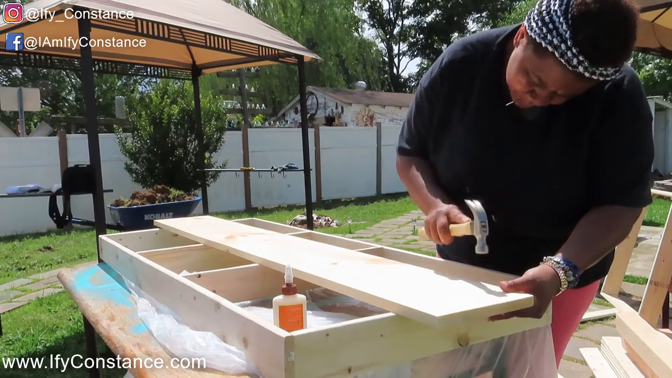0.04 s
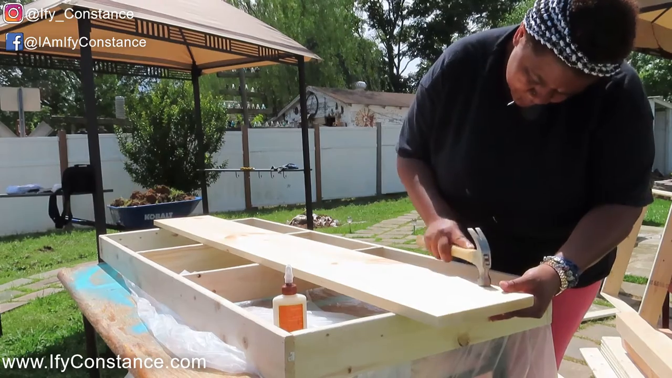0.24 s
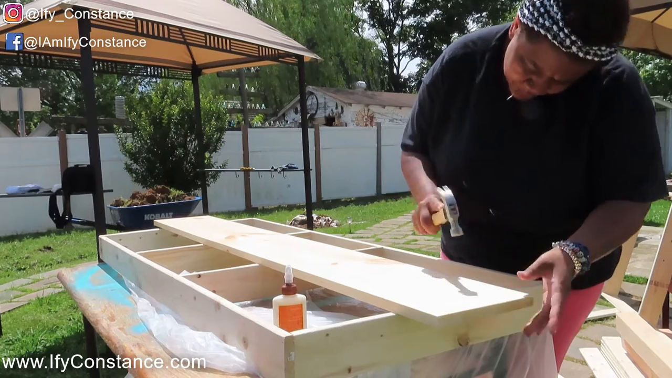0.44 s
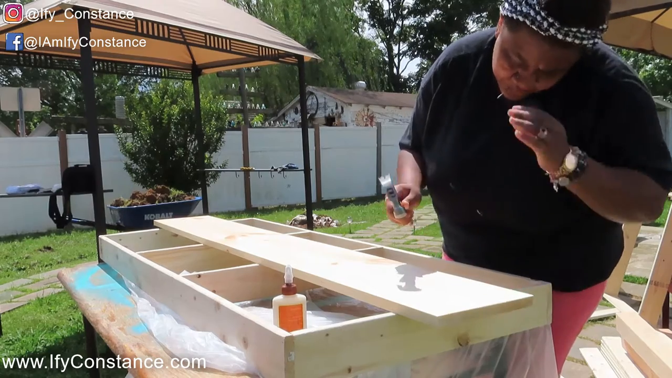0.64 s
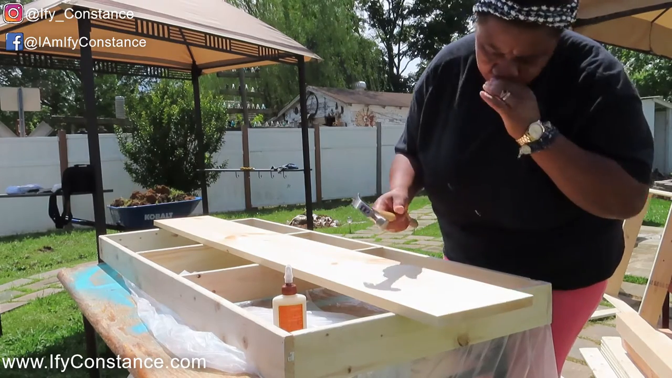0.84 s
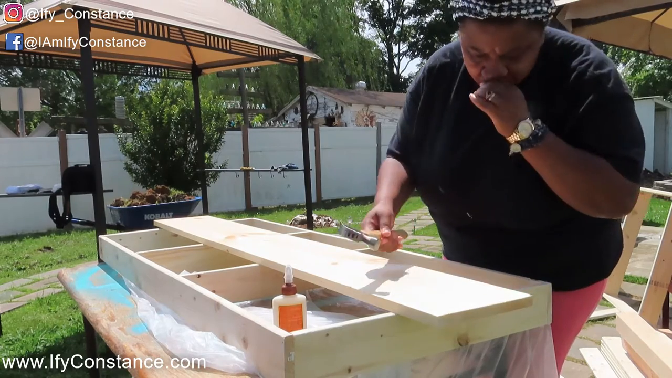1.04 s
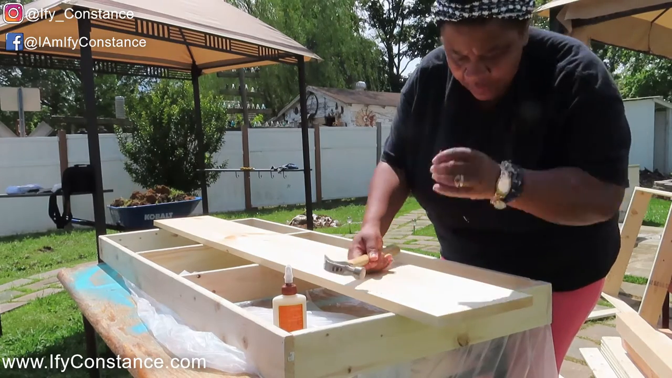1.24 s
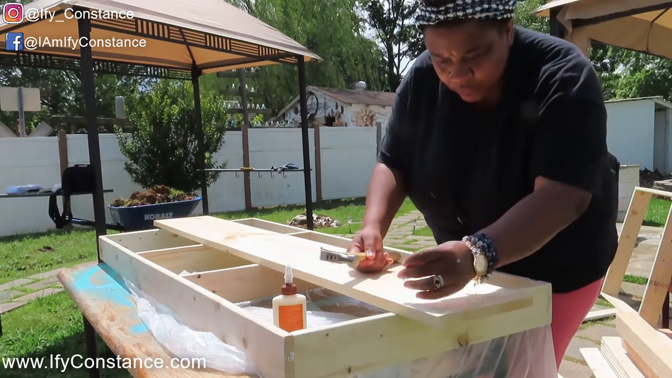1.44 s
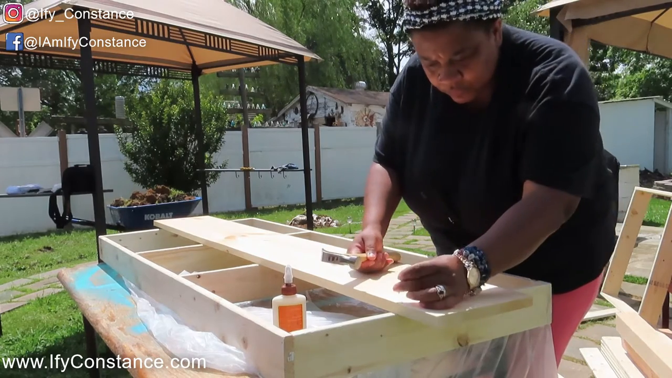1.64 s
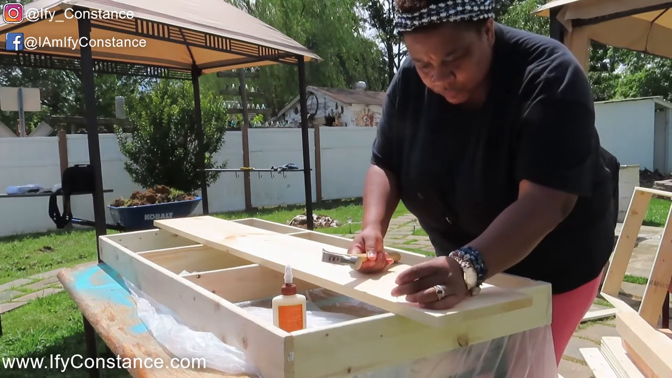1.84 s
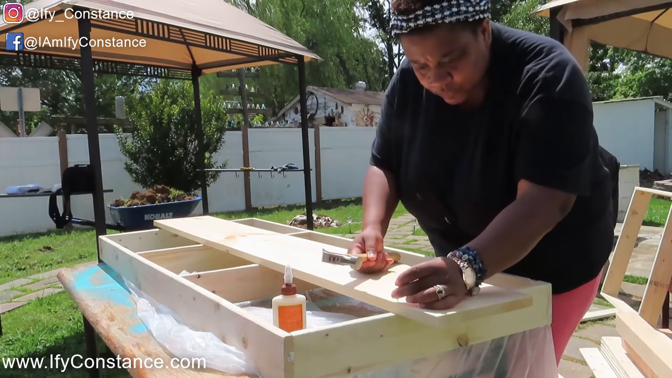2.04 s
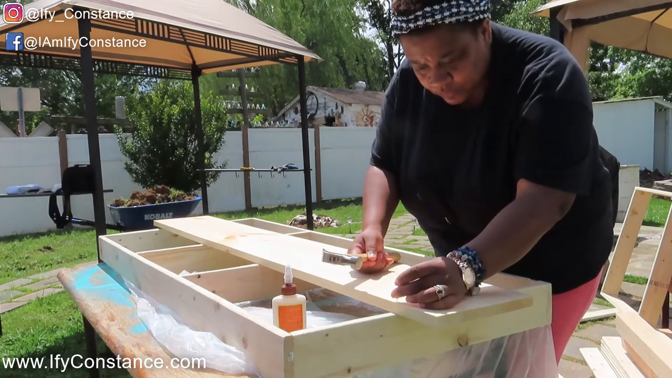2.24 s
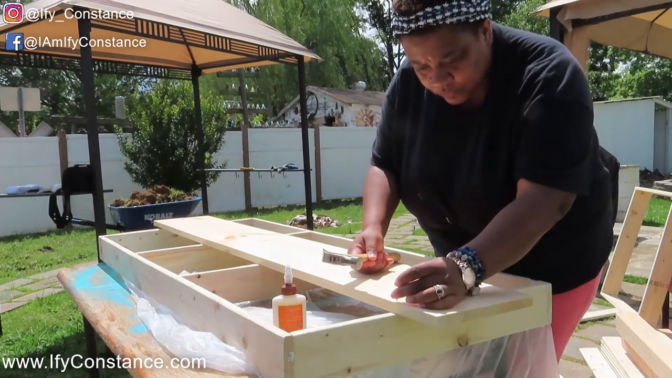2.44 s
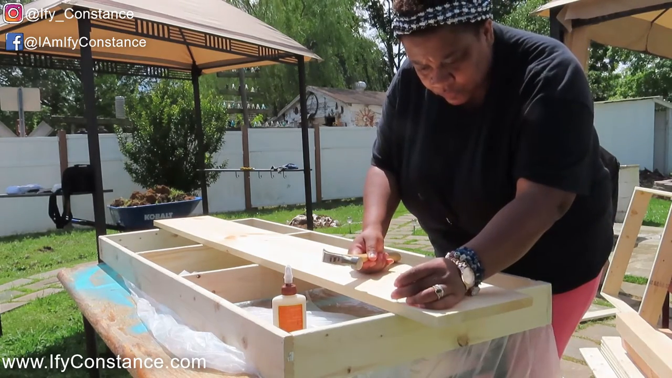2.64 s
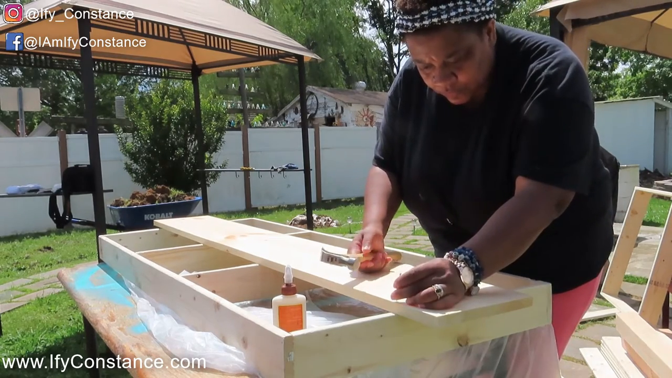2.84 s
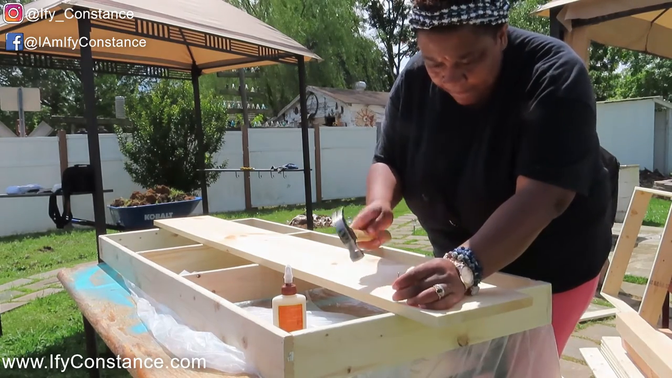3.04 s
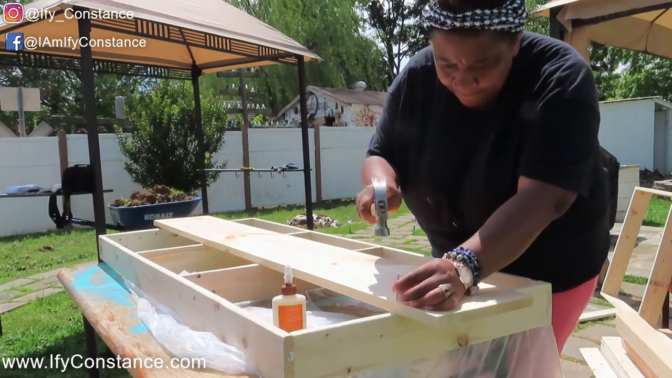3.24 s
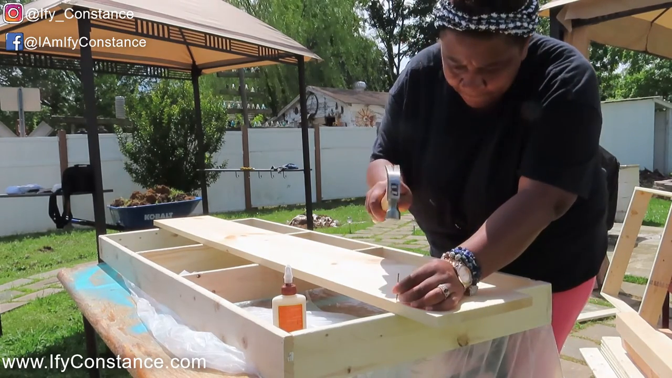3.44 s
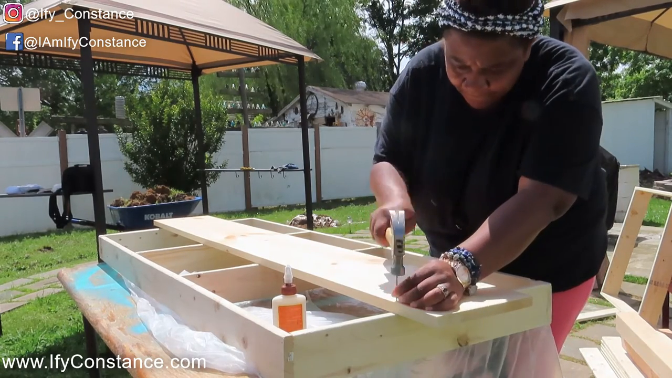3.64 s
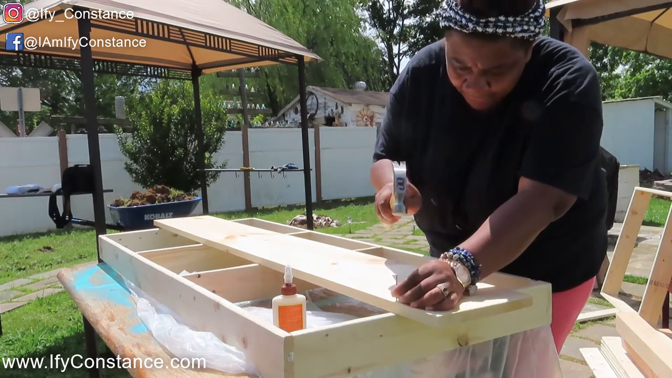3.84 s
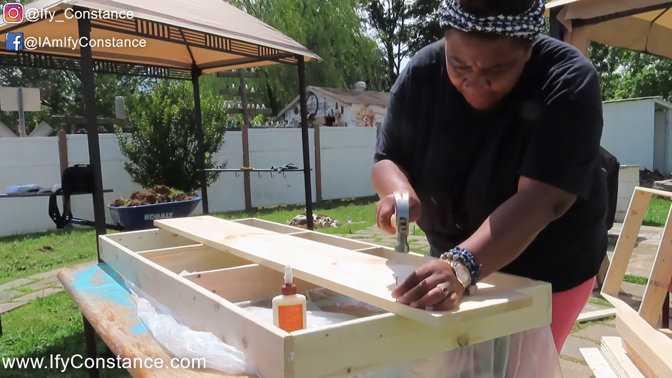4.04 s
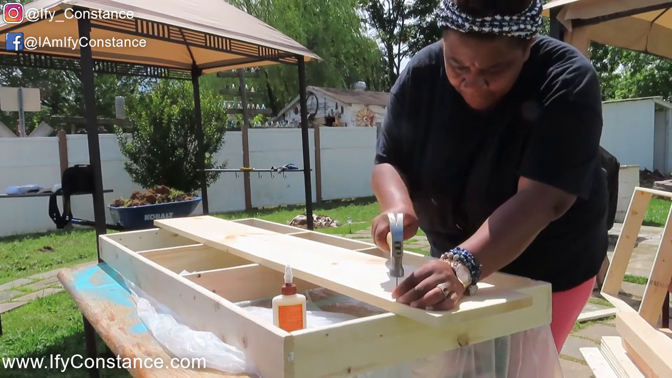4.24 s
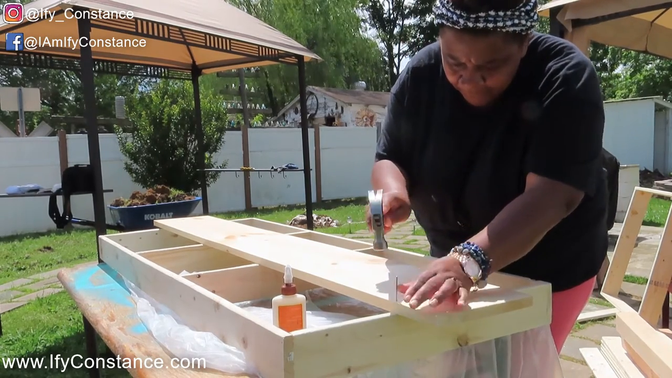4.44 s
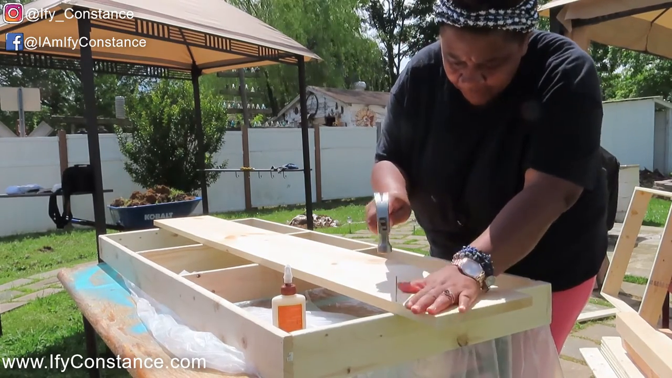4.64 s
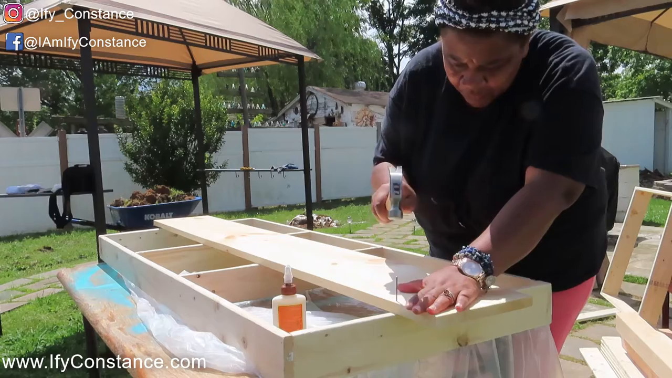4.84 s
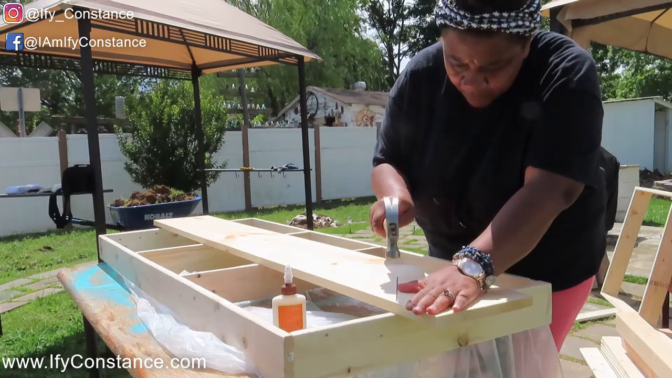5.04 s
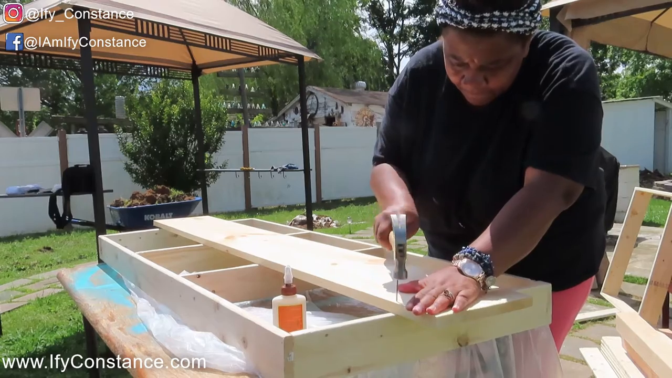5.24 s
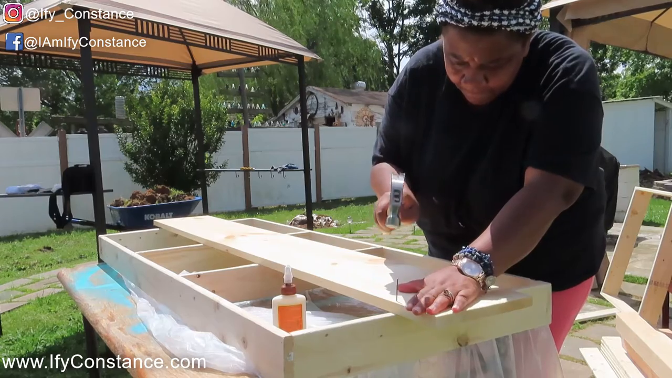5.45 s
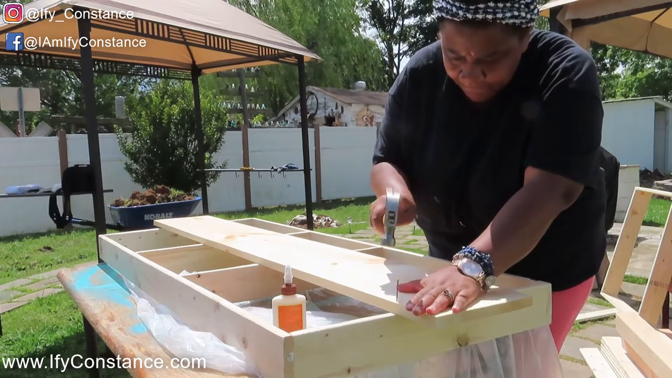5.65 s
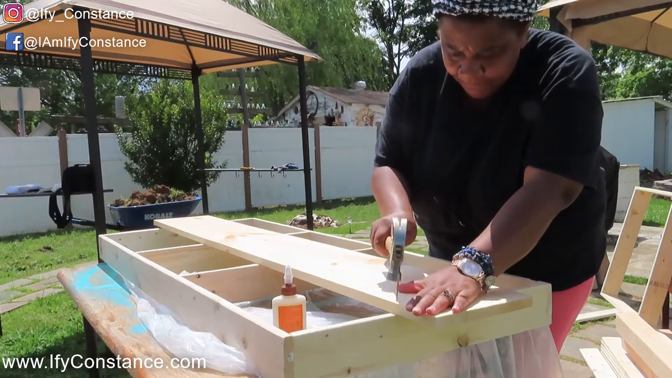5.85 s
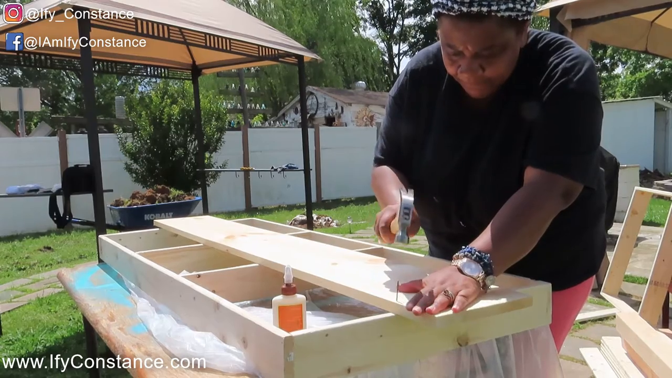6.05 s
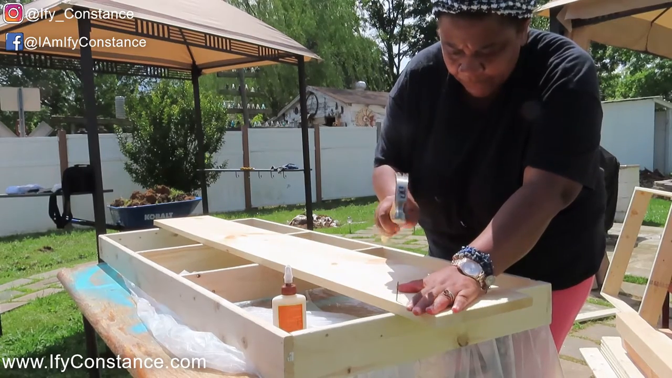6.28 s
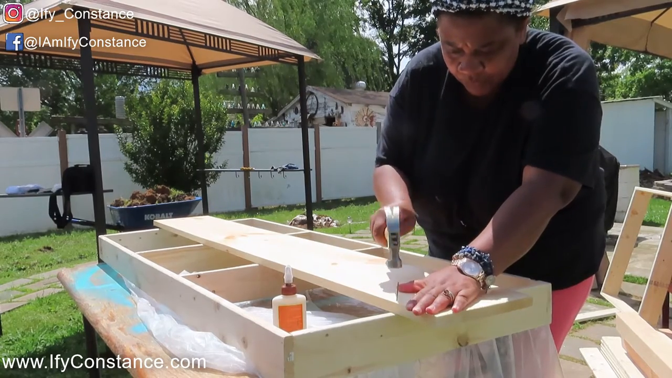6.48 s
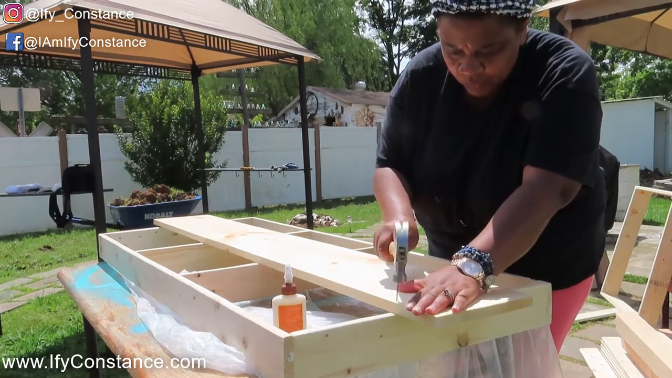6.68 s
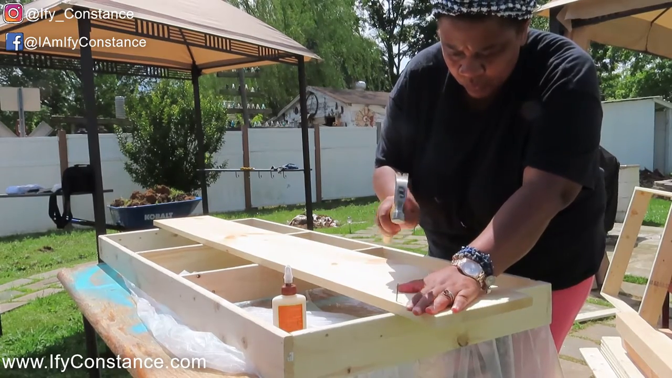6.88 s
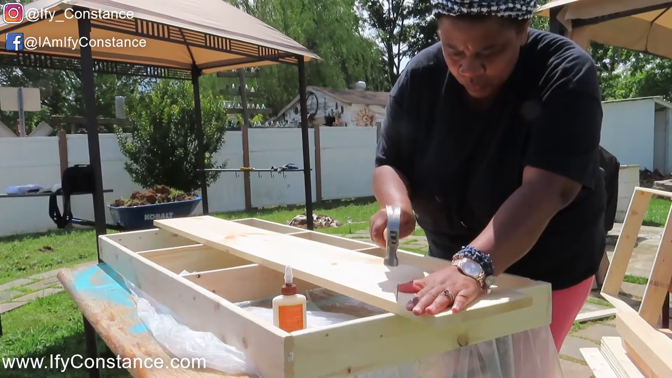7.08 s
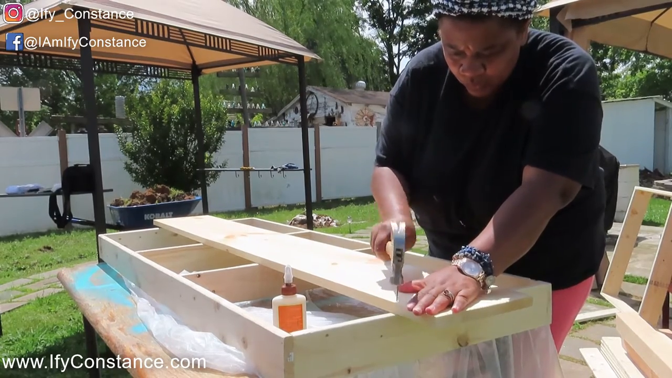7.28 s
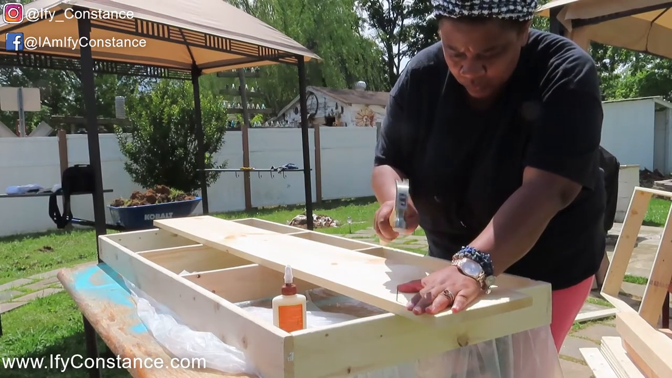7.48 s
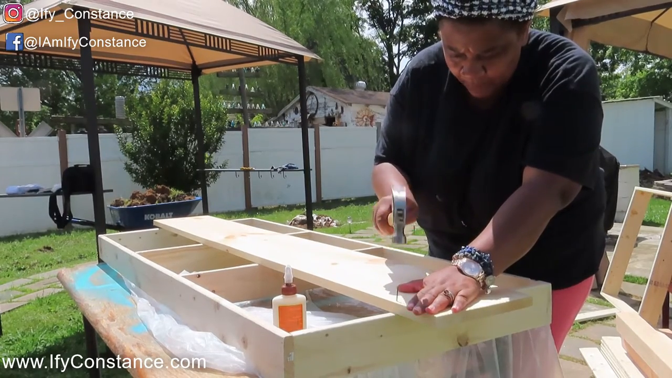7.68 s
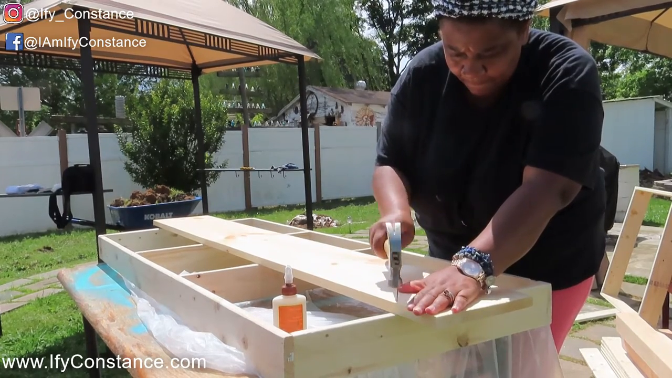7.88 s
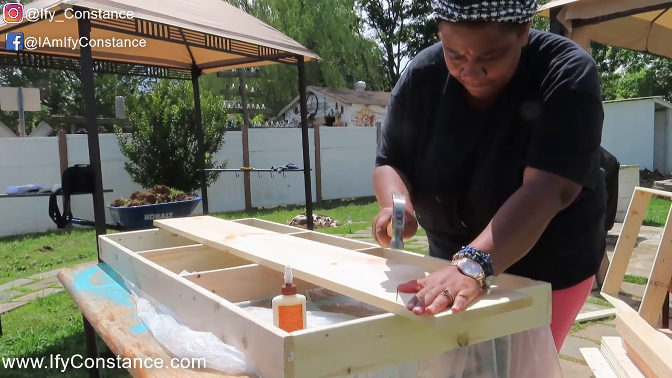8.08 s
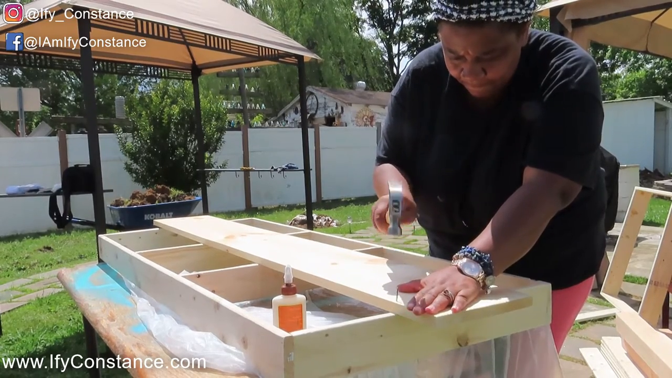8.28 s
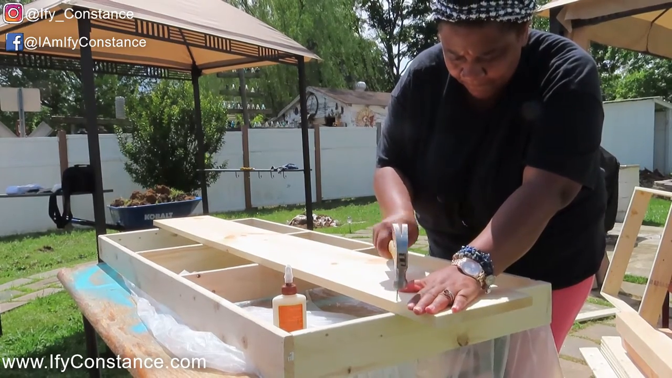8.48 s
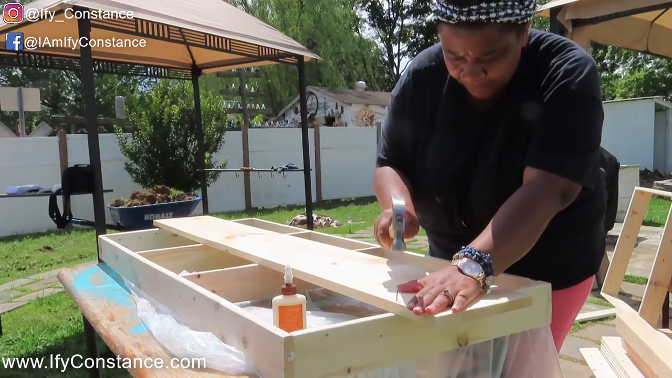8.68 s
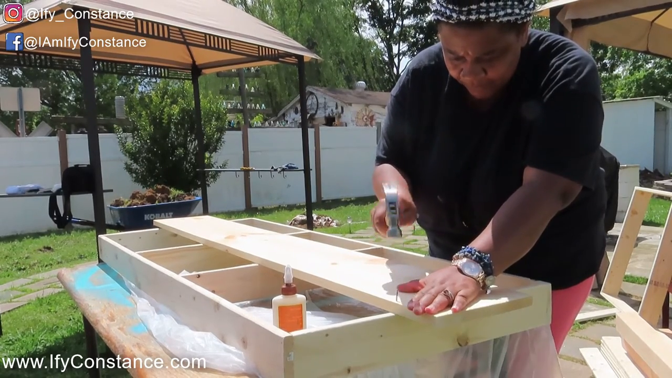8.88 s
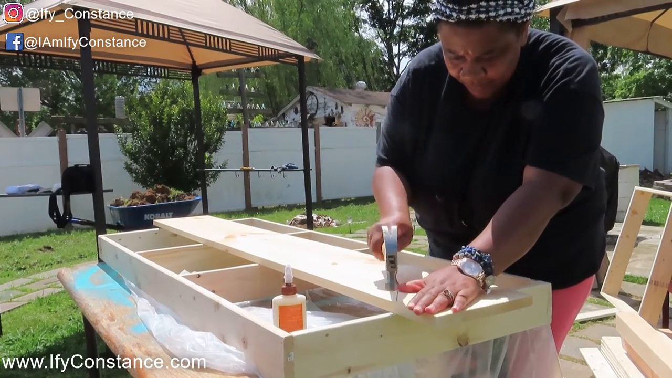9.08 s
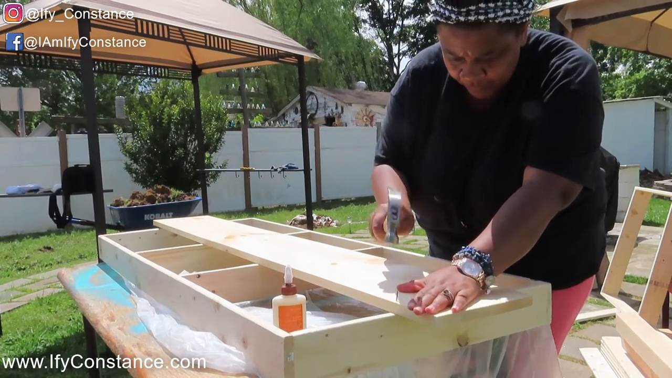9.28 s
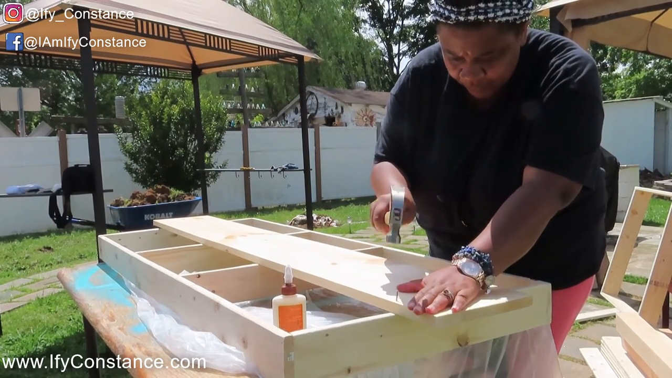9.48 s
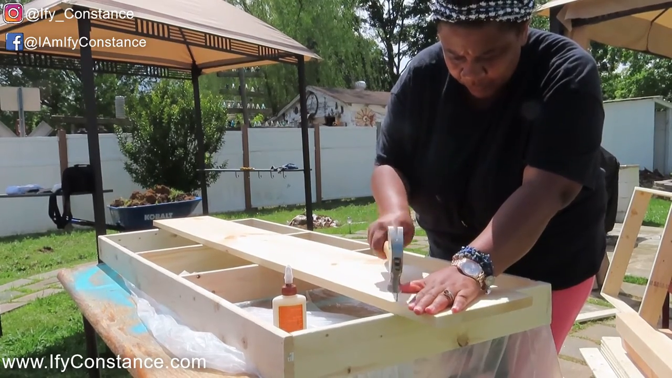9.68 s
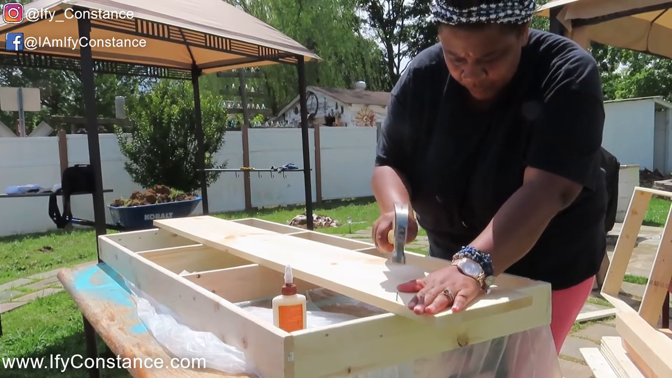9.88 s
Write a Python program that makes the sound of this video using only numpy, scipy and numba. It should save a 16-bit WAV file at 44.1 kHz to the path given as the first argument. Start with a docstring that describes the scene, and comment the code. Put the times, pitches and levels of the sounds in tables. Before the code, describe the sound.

Sharp woody hammer blows ring and slap back from a fenced yard, pausing for handling ticks and birdsong before a regular run of hits.

```python
"""Hammering nails in a fenced yard

A steel hammer drives nails through a pine board into a wooden frame: each blow is a noisy crack,
decaying board and frame tones and a rattle, and it comes back from the yard as filtered echoes.
Handling ticks are puffs of noise, a bird whistles gliding tones, a far engine and leaves are shaped
noise, and a fan hums on steady pitches. The camera raises its gain in the pause, lowers it when
blows are loud and limits the peaks."""
import sys
import numpy as np
from scipy import signal
from scipy.fft import rfft, irfft, next_fast_len
from scipy.io import wavfile
from scipy.ndimage import uniform_filter1d, minimum_filter1d
from numba import njit

SR = 44100
rng = np.random.default_rng(int(sys.argv[2]) if len(sys.argv) > 2 else 0)


def dump_mix(stems):
    """Bounce the given channels to the path in sys.argv[1] as a 16-bit WAV at rate SR."""
    frames = np.atleast_2d(stems).T  # one column per channel
    limited = np.clip(frames, -1, 1)  # hard clip at full scale
    pcm = np.round(limited * 32767).astype(np.int16)
    wavfile.write(sys.argv[1], SR, pcm)


N = 437472
LEAD_S, YARD_S = 0.15, 0.6  # time kept before the start for an earlier blow; length of the yard responses


def undb(db):
    """Turn decibels into a plain amplitude factor."""
    return 10 ** (np.asarray(db) / 20)


def colour(x, points):
    """Filter a sound by a spectrum of (pitch_hz, level_db) points."""
    size = next_fast_len(x.shape[-1])
    hz, db = np.transpose(points)
    bin_hz = np.arange(size // 2 + 1) * SR / size
    gain = undb(np.interp(np.log(bin_hz + 1), np.log(hz), db))
    return irfft(rfft(x, size) * gain, size)[..., :x.shape[-1]]


def bell(hz, octaves):
    """Spectrum points of a band that falls 30 dB two widths away."""
    steps = (-3, -2, -1, -0.5, 0, 0.5, 1, 2, 3)
    return [(hz * 2 ** (octaves * k), -7.5 * k * k) for k in steps]


def unit(x):
    """Scale a sound to an average (RMS) level of 1."""
    return x / np.sqrt(np.mean(x ** 2))


def decay(t, t60):
    """Fade that loses 60 dB in t60 seconds."""
    return np.exp(-np.log(1000) * t / t60)


def soft_rise(t, rise):
    """Build-up that starts gently and takes about rise seconds."""
    return 1 - np.exp(-(t / rise) ** 2)


def burst(hz, octaves, length):
    """A short puff of band noise that starts within a cycle and dies away; energy 1."""
    t = np.arange(int(6 * length * SR) + 64) / SR
    noise = colour(rng.standard_normal(4096 + len(t)), bell(hz, octaves))[:len(t)]
    puff = noise * np.exp(-t / length) * soft_rise(t, 1 / hz)
    return puff / np.sqrt(np.sum(puff ** 2))


def add(out, x, s):
    """Mix x into out from s seconds on."""
    i = int(s * SR)
    out[i:i + len(x)] += x[:len(out) - i]


def walk(rate):
    """Random levels held 1 / rate seconds and smoothed twice; spread near 1."""
    k = int(SR / rate)
    held = np.repeat(rng.standard_normal(N // k + 1), k)
    return 1.3 * uniform_filter1d(uniform_filter1d(held, k), k)[:N]


def lumps(size, per_s, depth_db):
    """Gain that jumps at random in clumps a few ms long."""
    k = int(SR / per_s)
    held = np.repeat(rng.standard_normal(size // k + 1), k)
    return undb(depth_db * uniform_filter1d(held, k // 2)[:size])


def ring(modes, t, phase, db):
    """Wood rings as a sum of modes: pure tones that each build up and decay."""
    hz, mode_db, t60, rise = np.transpose(modes)[:, :, None]
    swell = soft_rise(t, rise) * decay(t, t60)
    return np.sum(undb(mode_db + db) * swell * np.sin(2 * np.pi * hz * t + phase), axis=0)


def hardness_octaves(hz):
    """Octaves from 1500 Hz, held below 1000 Hz: a softer contact only dulls the upper modes."""
    return np.log2(np.maximum(hz, 1000) / 1500)


# noise of the steel crack: pitch_hz, level_db (dB per Hz)
CRACK_SPECTRUM = [(3000, -37), (4400, -3.5), (5200, 11.5), (6300, 9.5), (8000, 4), (10500, 3.5), (13000, 0),
                  (16000, -43.5)]
CRACK_DB, CRACK_T60_S, CRACK_RISE_S = -13, 0.024, 0.00064
CONTACT_S, LET_GO_DB = 0.0036, -3.5  # the crack drops when the head leaves the nail


def steel_crack(t):
    """Steel on steel gives a burst of treble noise that drops as the contact ends."""
    noise = unit(colour(rng.standard_normal(len(t)), CRACK_SPECTRUM))
    crack = noise * (1 - np.exp(-t / CRACK_RISE_S)) * decay(t, CRACK_T60_S)
    return crack * undb(LET_GO_DB * np.clip((t - CONTACT_S) * 2000, 0, 1))  # drops over 0.5 ms


# noise of the board chattering on the frame: pitch_hz, level_db (dB per Hz)
RATTLE_SPECTRUM = [(300, -38), (600, -5), (1200, 5.5), (2400, -5), (3200, -7), (4200, -24.5), (9000, -48.5)]
RATTLE_DB, RATTLE_T60_S, RATTLE_RISE_S = -14, 0.0952, 0.0024


def board_rattle(t):
    """The board chatters on the frame: fading noise broken into random clumps."""
    noise = unit(colour(rng.standard_normal(len(t)), RATTLE_SPECTRUM))
    return noise * lumps(len(t), 250.0, 3.9) * soft_rise(t, RATTLE_RISE_S) * decay(t, RATTLE_T60_S)


# blow as sent sideways into the yard: pitch_hz, level_db (dB per Hz)
KNOCK_SPECTRUM = [(80, -21), (200, 6.5), (450, 9), (800, -1), (1100, 1.5), (1500, 2), (2500, -5.5),
                  (3200, -13.5), (4400, -22), (6000, -26), (10000, -34.5), (16000, -50)]
LOW_MODES_HZ, MIDDLE_MODES_HZ = 850, 1700  # low modes lie below the first, middle modes between the two
CLICK_AT = 1000  # samples of room before the click, as its filtered sound spreads both ways


def sideways_knock(size, tilt_db, low_db, middle_db):
    """Seen edge-on, the board's modes blur into one short broad knock."""
    sent = []
    for hz, level_db in KNOCK_SPECTRUM:
        level_db = level_db + tilt_db * hardness_octaves(hz)
        if hz < LOW_MODES_HZ:
            level_db += low_db
        elif hz < MIDDLE_MODES_HZ:
            level_db += middle_db
        sent.append((hz, level_db))
    return colour(signal.unit_impulse(size, CLICK_AT), sent)


# blows on the board: start_s, level_db, hardness of contact (tilt_db per octave), crack_db,
# low_modes_db, middle_modes_db, frame_thud_db, share sent into the yard_db, share reaching its far_end_db
BLOWS = [(-.12, 5, 2.5, -6, -0.5, 4.5, 2.5, 2, 4.5), (.189, 1, -3.5, -9, -0.5, 4, 1.5, 9, 1),
         (3.682, -23, -2.5, -9.5, -2.5, -6.5, 21.5, 15.5, 3), (3.963, -2, 0.5, -8, -4.5, 1, 2.5, 7, 6),
         (4.239, -0.5, 0.5, -6, -4.5, -2, 2, 10, 11), (5.006, 4.5, 2, -4.5, -3, 2, 3, 4, 5),
         (5.273, 3.5, 2, -3.5, -6, -1.5, 2.5, 8, 9), (5.556, 5, 3, -2.5, -1.5, -1, 4, 7, 11),
         (5.852, 5, 1.5, -7, -3.5, 0, 3.5, 9, 10), (6.1367, 7.5, 1.5, -5, -4, -1, 1, 8, 9),
         (6.415, 6, 2, -3, -3, -1.5, 2.5, 9.5, 11.5), (6.706, 7, 3, -2, 0, 1, 2.5, 8, 10),
         (7.0, 7, 3, -6, -1.5, 2.5, 1, 7.5, 7.5), (7.289, 5.5, 3, -5.5, -2.5, 1.5, 1, 8, 8.5),
         (7.57, 4, 3.5, -4, -0.5, -0.5, 2, 7.5, 10), (7.856, 0.5, 3.5, -5, 1.5, 1, 3.5, 9, 9.5),
         (8.15, -2.5, 4, -3.5, 2, 1.5, 6, 8.5, 10), (8.447, -3, 4, -4, 2, 0, 5.5, 9.5, 9.5),
         (8.751, -3.5, 3, -4, 1, 0, 5.5, 10.5, 10.5), (9.043, -4, 4.5, -4, 4, 0, 5.5, 9, 11),
         (9.359, -4.5, 3.5, -4, 2, 1, 6, 10, 9.5), (9.653, -3, 4, -3.5, 4, 3, 4.5, 8, 7)]
# board modes: pitch_hz, level_db, t60_s, rise_s; low bending waves travel slowly and build up late
BOARD_MODES = [(483, -21.5, 0.14, 0.0029), (580, -21, 0.08, 0.017), (700, -8, 0.037, 0.003),
               (936, -17.5, 0.084, 0.0033), (1027, -18.5, 0.079, 0.0057), (1171.5, -8.5, 0.043, 0.0047),
               (1261, -12.5, 0.031, 0.0018), (1459, -7.5, 0.05, 0.004), (1580, -8, 0.033, 0.0024),
               (1793, -20, 0.043, 0.0023), (2074, -8.5, 0.025, 0.00057), (2291, -8, 0.026, 0.00047),
               (2542, -2, 0.026, 0.0041), (2670, -15.5, 0.0054, 0.00066), (2775, -15, 0.036, 0.0019),
               (2997, -7, 0.026, 0.0023), (3616, -23.5, 0.024, 0.0013), (4110, -31.5, 0.021, 0.000607)]
# hollow frame modes: pitch_hz, level_db, t60_s, rise_s
FRAME_MODES = [(88.5, -34, 0.14, 0.01), (163.2, -32, 0.23, 0.019), (204.3, -17.5, 0.044, 0.004),
               (333.4, -40, 0.2, 0.0026), (409.6, -37, 0.096, 0.0011)]
AIM_RAD = 0.55  # spread of the direction in which a blow is sent


def hammer(scatter_db=1.0, scatter_rad=0.6, scatter_pitch=0.0045):
    """Every blow lands a little differently, so the modes scatter about one pattern.

    Rows: toward the camera, toward two sides of the yard, toward two sides of its far end."""
    out = np.zeros((5, N + int(LEAD_S * SR)))
    t = np.arange(int(0.15 * SR)) / SR
    board_hz = np.array(BOARD_MODES)[:, :1]
    pattern = np.pi * np.arange(len(BOARD_MODES))[:, None]  # neighbouring modes start in opposite directions
    low = board_hz < LOW_MODES_HZ
    middle = ~low & (board_hz < MIDDLE_MODES_HZ)
    for s, db, tilt_db, crack_db, low_db, middle_db, thud_db, yard_db, far_db in BLOWS:
        phase_luck, level_luck, pitch_luck = rng.standard_normal((3, len(BOARD_MODES), 1))
        modes = np.array(BOARD_MODES)
        modes[:, 0] *= 1 + scatter_pitch * pitch_luck[:, 0]
        mode_db = tilt_db * hardness_octaves(board_hz) + low_db * low + middle_db * middle
        blow = ring(modes, t, pattern + scatter_rad * phase_luck, mode_db + scatter_db * level_luck)
        blow += undb(RATTLE_DB + 0.28 * tilt_db) * board_rattle(t)
        blow += ring(FRAME_MODES, t, 0, thud_db)
        blow += undb(CRACK_DB + crack_db) * steel_crack(t)
        add(out[0], undb(db) * blow, s + LEAD_S)

        knock = undb(db + yard_db) * sideways_knock(len(t), tilt_db, low_db, middle_db)
        aim = AIM_RAD * rng.standard_normal()
        sides = np.array([np.cos(aim), np.sin(aim)])
        shares = np.concatenate([sides, undb(far_db - yard_db) * sides])
        for row, share in zip(out[1:], shares):
            add(row, share * knock, s + LEAD_S - CLICK_AT / SR)
    return out


# diffuse echoes from bushes, sheds and houses: delay_s, level_db, smear_s, pitch_hz, width_octaves
ECHOES = [(0.013, -15, 0.0028, 1285, 1.6), (.036, -21.5, 0.0038, 1512, 1.4), (.032, -16, .006, 3490, 0.47),
          (0.043, -9, 0.022, 1045, 0.22), (.055, -14, 0.0049, 2328, 0.41), (.064, -12.5, 0.013, 706, 0.32),
          (.092, -19, 0.023, 2030, 0.38), (0.12, -35.5, .01, 5750, 1.25), (.133, -26.5, 0.01, 1170, 2),
          (.2, -38.5, 0.068, 1200, 0.3)]
NEAR_S = 0.04  # echoes later than this count as far


def echoes(far):
    """Rough surfaces return smeared noise, either later (far) or sooner than NEAR_S."""
    response = np.zeros(int(YARD_S * SR))
    for delay, db, smear, hz, octaves in ECHOES:
        if (delay > NEAR_S) == far:
            level = undb(db) * np.sqrt(hz * octaves / SR) * 4
            add(response, level * burst(hz, octaves, smear), delay)
    return response


# scattered sound of the yard: pitch_hz, level_db, t60_s
YARD_BANDS = [(142, -19, 0.29), (318, -21.5, 0.33), (684, -8, 0.2), (1200, -16.5, 0.5), (2360, -14, 0.79),
              (3250, -8.5, 0.63), (6000, -11.5, 0.42), (10800, -7.5, 0.25)]
CLUMP_DB = 2.5


def yard():
    """Near echoes over a diffuse scatter that builds up in a few ms and fades band by band."""
    t = np.arange(int(YARD_S * SR)) / SR
    response = np.zeros(len(t))
    for hz, db, t60 in YARD_BANDS:
        noise = colour(rng.standard_normal(len(t)), bell(hz, 1 / 2))
        tail = noise * (1 - np.exp(-t / 0.0058)) * decay(t, t60)
        response += undb(db) * tail / np.sqrt(np.sum(tail ** 2))
    # bushes and posts scatter in clumps that blend later on
    response *= lumps(len(t), 120.0, CLUMP_DB) ** np.exp(-t / 0.12)
    return response + echoes(False)


# clean slaps from flat fence panels and walls: delay_s, level_db, pitch_hz, width_octaves
SLAPS = [(.058, -37, 9960, 0.55), (.063, -25.5, 1078, 0.52), (0.0863, -9, 1956, 0.55),
         (0.098, -25, 1692, 0.63), (.122, -21, 5340, 0.36), (.132, -22, 2800, 0.32),
         (0.139, -28.5, 1100, 0.49), (.166, -29.5, 8500, 0.63), (.222, -28, 2100, .5)]
SLAP_SMEAR_S = 0.0037


def slaps():
    """Each flat wall returns one short band of sound with a sharp front and a ragged end."""
    response = np.zeros(int(YARD_S * SR))
    for delay, db, hz, octaves in SLAPS:
        level = undb(db) * np.sqrt(hz * octaves / SR) * 2
        add(response, level * burst(hz, octaves, SLAP_SMEAR_S), delay)
    return response


def returns(sent, one, two):
    """Mid and side of what two views of the same surfaces send back."""
    def echo(x, response):
        return signal.fftconvolve(x, response)[int(LEAD_S * SR):][:N]

    mid = echo(sent[0], one) + echo(sent[1], two)
    side = echo(sent[0], two) - echo(sent[1], one)
    return np.array([mid, side])


# small ticks and scuffs of hands, nail and tools: start_s, level_db, pitch_hz, width_octaves, length_s
TICKS = [(1.474, -39, 1044, 0.39, 0.0076), (1.474, -44.5, 1900, 0.55, .005), (1.473, -56, 450, .6, .008),
         (1.487, -59, 1900, .15, .025), (2.164, -76.5, 6500, 0.33, 0.03), (3.458, -53, 2600, 0.7, 0.003),
         (3.498, -43, 3300, .2, 0.003), (3.499, -71, 12000, 0.49, 0.0027),
         (3.68, -49.5, 11000, 0.27, 0.0045), (3.764, -45.5, 200, 0.38, 0.0083),
         (4.56, -54.5, 1740, 0.69, 0.022), (4.575, -75.5, 4530, 1.2, 0.016),
         (4.558, -72.5, 10000, .4, .008), (4.57, -69, 7500, .3, .008), (4.589, -64, 3988, 1.4, .003),
         (4.635, -60, 1500, 0.64, 0.0127), (9.101, -31, 1244, 0.41, 0.019),
         (9.093, -35.5, 2400, 0.2, 0.021)]


def ticks():
    """Handling makes brief puffs of band noise."""
    out = np.zeros(N)
    for s, db, hz, octaves, length in TICKS:
        add(out, undb(db) * np.sqrt(length * SR) * burst(hz, octaves, length), s)
    return out


# bird notes: start_s, length_s, first_pitch_hz, last_pitch_hz, level_db
BIRD_NOTES = [(2.266, 0.12, 2310, 2242, -70), (2.666, 0.042, 3100, 3070, -67),
              (2.701, 0.03, 2430, 2550, -63), (2.72, 0.053, 2350, 2030, -66),
              (2.765, 0.1, 2010, 2210, -66.5), (2.852, 0.12, 2220, 2510, -72),
              (3.135, 0.11, 3145, 3200, -73.5), (3.165, 0.022, 2610, 2560, -58.5),
              (3.195, 0.035, 1970, 2040, -64.5), (3.228, 0.035, 2096, 2150, -64),
              (3.272, 0.049, 2490, 2020, -57.5), (3.31, .035, 3260, 3160, -71),
              (3.33, .02, 2110, 2154, -69), (3.383, .025, 2100, 2155, -63), (3.61, 0.028, 2950, 3150, -64),
              (3.727, 0.032, 2590, 2690, -64.5), (3.76, 0.034, 2640, 2200, -60),
              (3.905, .025, 1950, 1900, -63.5), (3.925, 0.028, 1880, 1600, -67),
              (3.79, .025, 2100, 2600, -67.5)]
NOTE_ARCH, WARBLE = 0.5, 0.02  # power of the swelling arch; pitch spread as a share of the pitch
FLUTTER_DB, BIRD_ECHO_DB = 2.5, -7


def bird():
    """Gliding near-sine whistles: each swells and fades, warbles in pitch and flutters in level."""
    out = np.zeros(N)
    warble = 1 + WARBLE * walk(120)
    for s, length, first_hz, last_hz, db in BIRD_NOTES:
        u = np.arange(int(length * SR)) / (length * SR)  # 0 to 1 along the note
        hz = (first_hz + (last_hz - first_hz) * u) * warble[int(s * SR):][:len(u)]
        whistle = np.sin(2 * np.pi * np.cumsum(hz) / SR)
        add(out, undb(db) * np.sin(np.pi * u) ** NOTE_ARCH * whistle, s)
    return np.sqrt(2) * out * undb(FLUTTER_DB * walk(90))


# far engine passing, and the wind in the leaves: time_s, engine_db, leaves_db
AFAR = [(0, -54.5, -59), (.6, -58, -68.5), (1.2, -57, -67), (1.7, -57, -64), (2.4, -55.5, -68),
        (2.9, -55, -66.5), (3.3, -52, -63.5), (3.6, -50, -58.5), (4.1, -48.5, -67.5), (4.75, -51, -66),
        (5.3, -47.5, -62), (5.8, -49, -62), (6.8, -48, -62.5), (7.8, -54, -61), (9, -59, -68),
        (9.92, -59, -72)]
# engine rumble: pitch_hz, level_db (dB per Hz)
RUMBLE_SPECTRUM = [(18, -75), (30, -10.5), (60, 0), (112, 3.5), (170, 2), (240, -3), (400, -11.5),
                   (700, -16.5), (1200, -28), (2500, -52.5)]
# leaves and distant air: pitch_hz, level_db (dB per Hz)
AIR_SPECTRUM = [(300, -9.5), (500, -1), (800, -7), (1300, -5.5), (2500, -6.5), (3400, -12), (4500, -20),
                (7000, -27), (12000, -34), (13500, -48.5), (14500, -81)]
# width of the background: pitch_hz, side_minus_mid_db
BACKGROUND_WIDTH = [(30, -24.5), (110, -24), (200, -14), (380, -4.5), (700, -9), (1290, -6), (2380, -13),
                    (4400, -2), (8120, -3), (15000, -3.5)]
# fan tones: pitch_hz, level_db
FAN_TONES = [(118.4, -64.5), (239, -67.5), (320, -77.5), (402, -77), (485, -83)]


def background():
    """Throbbing engine noise, airy leaf noise and a fan's wavering tones; returns mid and side."""
    t = np.arange(N) / SR
    s, engine_db, leaves_db = np.transpose(AFAR)
    rumble = unit(colour(rng.standard_normal((2, N)), RUMBLE_SPECTRUM))
    rumble *= undb(np.interp(t, s, engine_db) + 1.7 * walk(11.0))
    air = unit(colour(rng.standard_normal((2, N)), AIR_SPECTRUM))
    air *= undb(np.interp(t, s, leaves_db) + 0.94 * walk(8.6))
    hum = np.zeros(N)
    for hz, db in FAN_TONES:
        tone = np.sin(2 * np.pi * hz * t + 0.49 * walk(3.0))
        hum += np.sqrt(2) * undb(db + 2.1 * walk(5.3)) * tone
    mid, side = rumble + air
    return mid + hum, colour(side, BACKGROUND_WIDTH)


# width of the near sounds: pitch_hz, side_minus_mid_db
BLOW_WIDTH = [(200, -30), (1000, -40), (3000, -18.5), (5000, -14), (12000, -8)]
# width of the yard's answer: pitch_hz, side_minus_mid_db
YARD_WIDTH = [(200, -27.5), (1000, -21), (3000, -11.5), (5000, -0.5), (12000, 3.5)]


def scene():
    """Mix near sounds, their echoes and the background into left and right."""
    blows, *sent = hammer()
    handling = ticks()
    song = bird()
    for row in sent[::2]:  # one side of the yard and one side of its far end
        add(row, 0.19 * handling + undb(BIRD_ECHO_DB) * song, LEAD_S)
    from_yard = returns(sent[:2], yard(), yard())
    from_far_end = returns(sent[2:], echoes(True) + slaps(), echoes(True))
    back, aside = from_yard + from_far_end
    near = blows[int(LEAD_S * SR):] + handling + song
    mid, side = background()
    # close ports differ by a small lag, so the side of a near sound is a quarter turn from its mid
    lagged = signal.hilbert(near, next_fast_len(N))[:N].imag
    side = side + colour(lagged, BLOW_WIDTH) + colour(aside, YARD_WIDTH)
    return mid + near + back + np.array([side, -side])


@njit
def gains(peak, start_db, rise_db, fall_db, target, limit, hold, release):
    """Slow gain climbs under the target and sinks over it; a limiter grabs, holds and lets go."""
    out, db = np.empty(len(peak)), start_db
    held, seen, wait = 1.0, 0.0, 0.0  # limiter's cut, level followed, samples left to hold
    for i in range(len(peak)):
        slow = 10 ** (db / 20)
        seen = max(peak[i] * slow, seen * release)
        db += rise_db if seen < target else -fall_db * np.log10(seen / target)
        over = peak[i] * slow / limit
        if over >= held:
            held, wait = over, hold
        elif wait > 0:
            wait -= 1
        else:
            held = held ** release
        out[i] = slow / held
    return out


GAIN_START_DB, GAIN_TARGET_DB = -0.5, -18
GAIN_RISE_DB_S, GAIN_FALL_DB_S = 5.5, 26.5  # the fall is for a level ten times the target
LIMIT_DB, LIMIT_HOLD_S, LIMIT_RELEASE_S = 3, 0.03, 0.027
CEILING, TOP_HZ = 1, 16400  # clipping amplitude; treble cut-off


def record(dry):
    """The camera's gain control, limiter with 1 ms of look-ahead, soft clipping and treble cut-off."""
    loudest = np.abs(dry).max(axis=0)
    peak = -minimum_filter1d(-loudest, size=89)  # highest value within 1 ms either way
    gain = gains(peak, float(GAIN_START_DB), GAIN_RISE_DB_S / SR, GAIN_FALL_DB_S / SR,
                 float(undb(GAIN_TARGET_DB)), float(undb(LIMIT_DB)),
                 LIMIT_HOLD_S * SR, np.exp(-1 / (LIMIT_RELEASE_S * SR)))
    wet = dry * uniform_filter1d(gain, size=45)
    wet = wet / (1 + np.abs(wet / CEILING) ** 4) ** (1 / 4)
    cut_off = signal.ellip(12, 0.2, 100, TOP_HZ, fs=SR, output="sos")
    return signal.sosfilt(cut_off, wet)


dry = scene()
out = record(dry)
dump_mix(out)
```